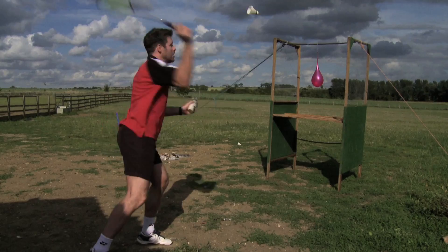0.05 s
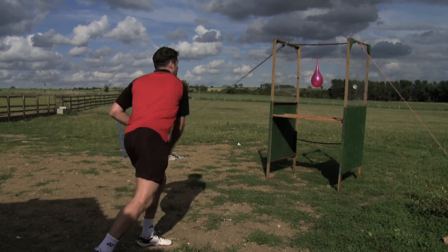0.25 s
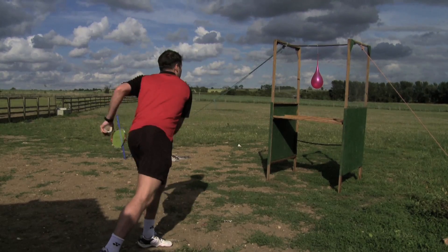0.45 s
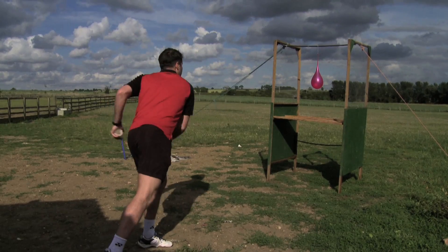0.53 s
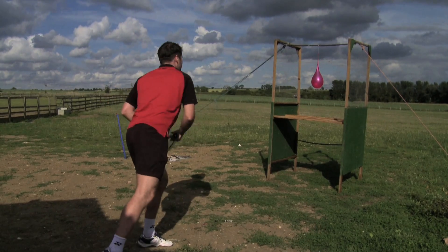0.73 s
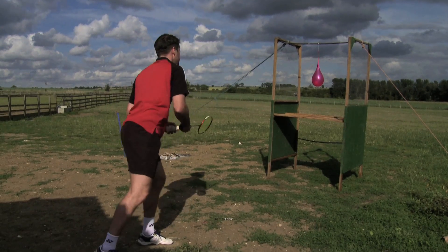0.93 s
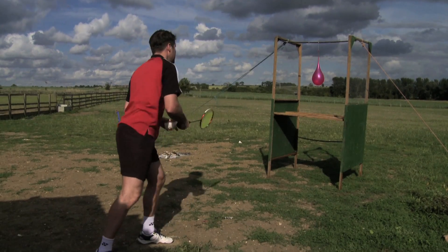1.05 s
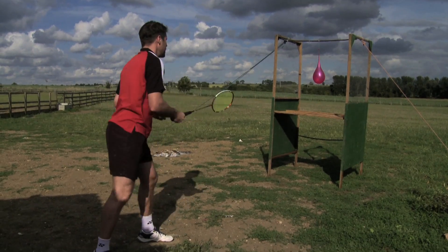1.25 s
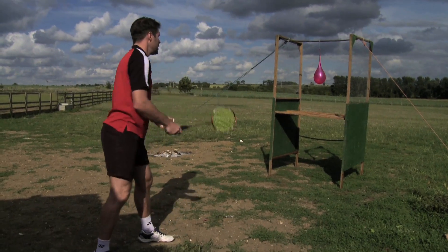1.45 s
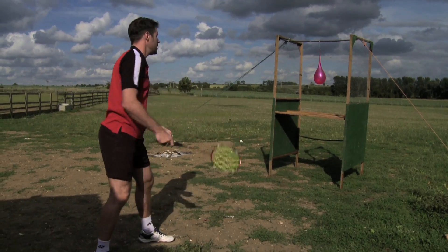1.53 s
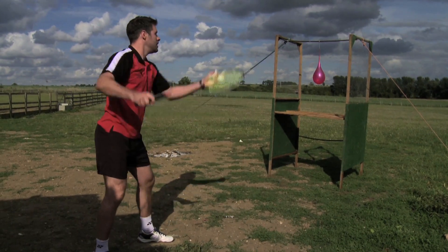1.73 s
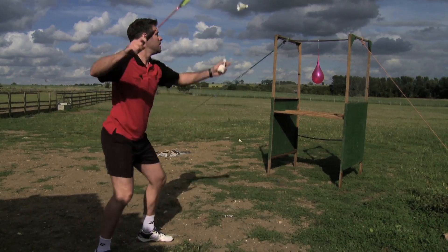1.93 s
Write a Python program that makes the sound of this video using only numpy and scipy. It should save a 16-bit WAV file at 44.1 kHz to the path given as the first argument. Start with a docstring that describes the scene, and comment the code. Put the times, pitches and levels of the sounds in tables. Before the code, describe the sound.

One loud badminton smash: a quick swish, then a crack with briefly ringing strings and a thin echo. The player then shuffles softly on dry earth, while distant country air and light gusts reach the microphone.

```python
"""A badminton smash in an open field: the cork cracks against the strings, which ring briefly.
The racket whistles through the air, the feathers brush the strings just before the hit, and the bang
scatters over the ground. The player then steps and shuffles on dry earth, with rustling clothes and
small ticks. Behind it all are distant country air, a faint hum and light wind on the microphone."""
import sys
import numpy as np
from scipy.fft import rfft, irfft
from scipy.io import wavfile
from scipy.ndimage import uniform_filter1d

SR = 44100
rng = np.random.default_rng(int(sys.argv[2]) if len(sys.argv) > 2 else 0)


def int16_out(signal):
    """Quantize to a 16-bit WAV file."""
    q = np.round(np.clip(np.atleast_2d(signal).T, -1, 1) * 32767)
    wavfile.write(sys.argv[1], SR, q.astype(np.int16))


N = 88200
HIT_S = .2319  # when the cork meets the strings


def cork_crack(level_db=15):
    """The cork hits the strings and sends out one sharp pulse of pressure."""
    # tone of the crack (frequency [Hz], relative level [dB])
    crack_tone = [(40, -28), (150, -9.5), (320, -1), (650, -1), (950, -6), (1350, -2), (2100, -8.5),
                  (3200, -15), (5000, -22), (9000, -27), (15000, -45)]
    # build a pulse with this tone whose energy comes as early as possible
    cepstrum = irfft(np.log(gains(crack_tone)), N)
    cepstrum[1:N // 2] *= 2
    cepstrum[N // 2 + 1:] = 0
    pulse = irfft(np.exp(rfft(cepstrum)), N)
    delayed = np.r_[np.zeros(int(HIT_S * SR)), pulse][:N]
    return -undb(level_db) * delayed / np.linalg.norm(pulse)


def racket_ring():
    """The hit sets the strings and frame vibrating for a moment."""
    # notes of the strings and frame (frequency [Hz], level [dB], time to fade by 60 dB [s])
    racket_notes = [(365, -27, .04), (640, -15, .04), (866, -28, 0.053), (1013, -25.5, .14),
                    (1135, -27, .04), (1285, -29, .1), (1648, -29, .11), (2135, -30, .07),
                    (2257, -27, 0.091), (2650, -26, .06), (3073, -29, .05), (3620, -29, .06),
                    (4310, -34, .05), (6710, -37, .05)]
    return ring(HIT_S, racket_notes)


def feather_skid(length_s=.0018, peak_db=-14, rise_db=8):
    """The shuttle skids on the strings, growing louder right up to the hit."""
    # tone of the skid (frequency [Hz], relative level [dB])
    skid_tone = [(200, -7), (1000, -3.5), (2500, -2), (4000, -2), (6500, -3), (10000, -4), (12500, -15),
                 (16000, -28)]
    remaining = np.clip((HIT_S - clock()) / length_s, 0, 1)
    touching = (remaining > 0) * (remaining < 1)
    return touching * undb(peak_db - rise_db * remaining) * noise(skid_tone)


def echoes():
    """The bang scatters off nearby things and the ground; a thin echo lingers across the field."""
    # tones of the near and far echoes (frequency [Hz], relative level [dB])
    near_tone = [(60, -19.5), (200, -9), (450, -1), (1100, 3.5), (1800, -7.5), (3000, -6.5), (6000, -16.5),
                 (10000, -19), (13000, -27), (16000, -35)]
    far_tone = [(100, -12), (500, -3), (1100, 0), (2600, -3), (5000, -9), (9000, -13), (15000, -27)]
    nearby = undb(-16.5) * fade(HIT_S, fade_s=.024)
    ground = undb(-26.5) * fade(HIT_S, fade_s=.15)
    far = undb(-45.5) * fade(HIT_S, fade_s=.45)
    return (nearby + ground) * noise(near_tone) + far * noise(far_tone)


def racket_swing(width_hz=90, hiss_db=-12):
    """Air swirls off the frame and shaft, whistling higher with speed, and hisses through the strings."""
    # course of the swing (time [s], pitch of the shaft [Hz], level [dB])
    swing_path = [(.17, 280, -74), (.195, 340.1, -58), (.205, 479.8, -47), (.213, 619.5, -34.5),
                  (.228, 689.4, -33), (.245, 970.7, -31), (.257, 819.5, -34), (.268, 620, -29.5),
                  (.281, 520, -48), (.32, 400, -87)]
    # racket parts that whistle (pitch [times the shaft's], relative level [dB])
    parts = [(.62, -12), (1, -0.5), (1.95, -13)]
    # tone of the hiss (frequency [Hz], relative level [dB])
    hiss_tone = [(200, -9.5), (1000, -4.5), (2500, 0.5), (6000, -3.5), (9000, -5.5), (12000, -17.5),
                 (16000, -28.5)]
    # thin whistle of the follow-through (peak time [s], rise [s], fall [s], level [dB])
    follow_swell = [(.288, .02, 0.015, -43.5)]
    t = clock()
    times, hz, db = np.array(swing_path).T
    pitch = np.interp(t, times, hz)
    loudness = undb(np.interp(t, times, db)) * (t > times[0]) * (t < times[-1])
    tones = sum(undb(level) * wavering_tone(pitch * ratio, width_hz * ratio) for ratio, level in parts)
    hiss = undb(hiss_db) * noise(hiss_tone)
    follow_through = swells(follow_swell) * wavering_tone(hz=1043, width_hz=64)
    return loudness * (tones + hiss) + follow_through


def footsteps():
    """Shoes land softly and scuff the dry earth."""
    # steps and scuffs (peak time [s], rise [s], fall [s], level [dB])
    steps = [(.364, .002, .008, -56), (.69, .006, .008, -60), (.779, 0.0016, .012, -50),
             (.858, 0.0069, .014, -60), (.919, .001, .009, -52), (1.893, .001, 0.0057, -53)]
    scuffs = [(.607, .035, .016, -54.5)]
    # their tones (frequency [Hz], relative level [dB])
    step_tone = [(40, 5), (100, 8), (220, -6), (480, -6), (630, 2), (740, -5), (860, 2), (1100, -10),
                 (1500, -16), (4000, -31), (15000, -48)]
    scuff_tone = [(100, -12), (400, 6), (1200, 2), (2800, -4), (5000, -17.5), (9000, -21.5), (15000, -32)]
    return swells(steps) * noise(step_tone) + swells(scuffs) * noise(scuff_tone)


def clothes():
    """Cloth rustles as the player moves."""
    # rustles (peak time [s], rise [s], fall [s], level [dB])
    rustles = [(.185, 0.042, 0.018, -60), (.55, .012, .03, -67.5), (1.32, 0.041, 0.032, -72.5),
               (1.405, .015, .012, -67.5)]
    # their tone (frequency [Hz], relative level [dB])
    rustle_tone = [(200, -8), (1200, -3), (2800, 0), (5000, -9), (9000, -22), (15000, -32)]
    return swells(rustles) * noise(rustle_tone)


def small_ticks():
    """Small things make tiny clicks, among them a shuttle dropping onto a frame."""
    # clicks (peak time [s], rise [s], fall [s], level [dB])
    ticks = [(.365, .001, 0.0034, -53), (1.041, .002, 0.0037, -61), (1.136, 0.00092, .002, -57.5),
             (1.15, 0.0011, .002, -59.5), (1.509, 0.00096, 0.0026, -63), (1.654, .001, .003, -62),
             (1.67, 0.00097, .002, -63)]
    # their tone (frequency [Hz], relative level [dB])
    tick_tone = [(200, -3), (1100, 4.5), (2500, 4), (4500, -5), (7000, -8.5), (10000, -21), (15000, -28)]
    return swells(ticks) * noise(tick_tone)


def string_ping(start_s=1.03, stop_s=1.2, ramp_s=.024):
    """A light touch sets the strings singing until they are damped again."""
    # notes of the undamped strings (frequency [Hz], level [dB], time to fade by 60 dB [s])
    ping_notes = [(1087, -60, .6), (6600, -79, .8), (6750, -79, .7), (7340, -77, .8)]
    ramp = np.clip(np.minimum(clock() - start_s, stop_s - clock()) / ramp_s, 0, 1)
    return ring(start_s, ping_notes) * ramp


def country_air(level_db=-60, flicker_db=.38):
    """Distant air makes a soft rush whose level flickers slightly."""
    # tone of the air (frequency [Hz], relative level [dB])
    air_tone = [(50, -4), (130, 0), (300, -2.5), (600, -5), (1100, -7), (1700, -14), (2800, -20),
                (4000, -26), (5500, -32), (8000, -35.5), (15000, -40.5)]
    return undb(level_db + flicker_db * wander(rate_hz=9)) * noise(air_tone)


def wind():
    """Light gusts rumble on the microphone."""
    # strength of the wind (time [s], level [dB])
    gusts = [(0, -52.5), (.55, -54.5), (.7, -43.5), (.8, -47), (1.0, -52), (1.27, -43), (1.48, -51.5),
             (1.64, -43.5), (1.72, -51), (1.79, -41.5), (1.9, -51)]
    # tone of the rumble (frequency [Hz], relative level [dB])
    wind_tone = [(8, -1), (25, -0.5), (40, -4), (65, -17.5), (110, -23), (300, -46), (1000, -77)]
    times, db = np.array(gusts).T
    return undb(np.interp(clock(), times, db)) * noise(wind_tone)


def hum_and_drone():
    """A faint low hum wavers while a far drone comes and goes."""
    # swell of the drone (peak time [s], rise [s], fall [s], level [dB])
    drone_swell = [(1.6, .2, .3, -65)]
    hum = undb(-63) * wavering_tone(hz=97.9, width_hz=7.8)
    return hum + swells(drone_swell) * wavering_tone(hz=362, width_hz=5.4)


def undb(db):
    """Turn decibels into a number to multiply by."""
    return 10 ** (np.asarray(db) / 20)


def clock():
    """Time of every sample in seconds."""
    return np.arange(N) / SR


def gains(tone):
    """Strength of every frequency, filled in between the points of a tone table."""
    hz, db = np.array(tone, float).T
    frequencies = np.arange(N // 2 + 1) * SR / N
    return undb(np.interp(np.log(frequencies + 1e-9), np.log(hz), db))


def noise(tone):
    """Noise with the given tone and a typical size of 1."""
    shaped = irfft(rfft(rng.standard_normal(N)) * gains(tone), N)
    return shaped / shaped.std()


def wander(rate_hz):
    """A smooth random drift with a typical size of 1."""
    hold = int(SR / rate_hz)
    stairs = np.repeat(rng.standard_normal(N // hold + 2), hold)
    drift = uniform_filter1d(stairs, hold)[:N]
    return drift / drift.std()


def fade(start_s, fade_s):
    """A loudness curve that starts suddenly, then drops 60 dB every fade_s."""
    age = clock() - start_s
    return (age >= 0) * np.exp(-np.log(1000) * np.maximum(age, 0) / fade_s)


def ring(start_s, notes):
    """Pure notes that start together and die away."""
    age = clock() - start_s
    return sum(undb(db) * fade(start_s, fade_s) * np.sin(2 * np.pi * hz * age)
               for hz, db, fade_s in notes)


def swells(rows):
    """A loudness curve of events that rise to a peak and fall away."""
    t = clock()
    return sum(undb(db) * np.exp(-np.maximum((at - t) / rise, (t - at) / fall))
               for at, rise, fall, db in rows)


def wavering_tone(hz, width_hz, roughness=.55):
    """A tone that wobbles in strength and pitch, faster for a larger width_hz."""
    wobble = 1 + roughness * (wander(2 * width_hz) + 1j * wander(2 * width_hz))
    phase = 2 * np.pi * np.cumsum(hz * np.ones(N)) / SR
    tone = np.real(wobble * np.exp(1j * phase))
    return tone / tone.std()


def scene():
    """The smash, the player and the field at one microphone."""
    smash = racket_swing() + feather_skid() + cork_crack() + racket_ring() + echoes()
    player = footsteps() + clothes() + small_ticks() + string_ping()
    field = country_air() + wind() + hum_and_drone()
    return (smash + player + field)[None]


def record(dry, top_hz=16700, slope_hz=1800):
    """Round off the loudest peak and cut the highest treble."""
    rounded = dry / (1 + dry ** 4) ** (1 / 4)
    frequencies = np.arange(N // 2 + 1) * SR / N
    passed = np.clip((top_hz - frequencies) / slope_hz, 0, 1)
    return irfft(rfft(rounded) * np.sin(np.pi / 2 * passed) ** 2, N)


dry = scene()
out = record(dry)
int16_out(out)
```